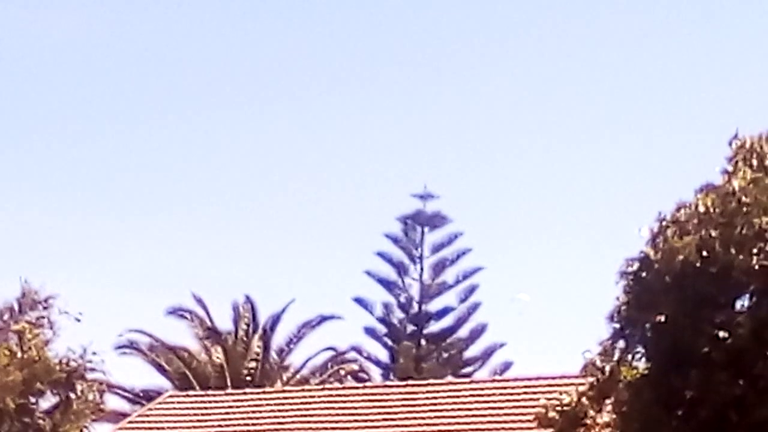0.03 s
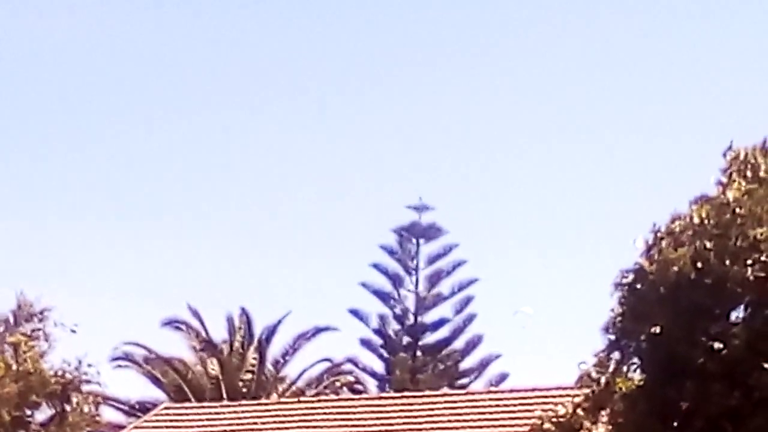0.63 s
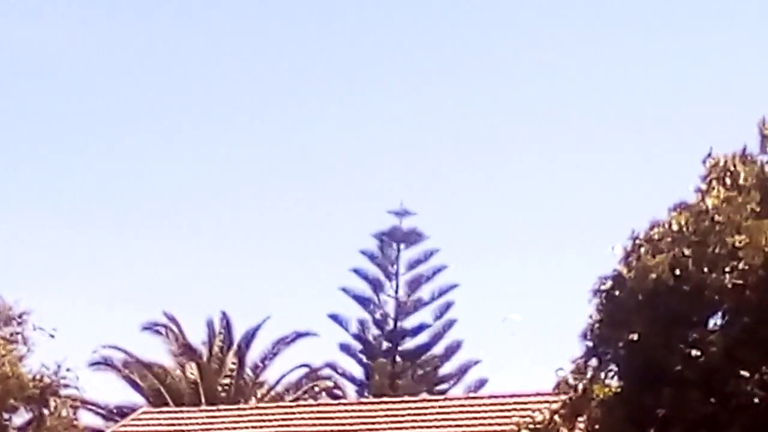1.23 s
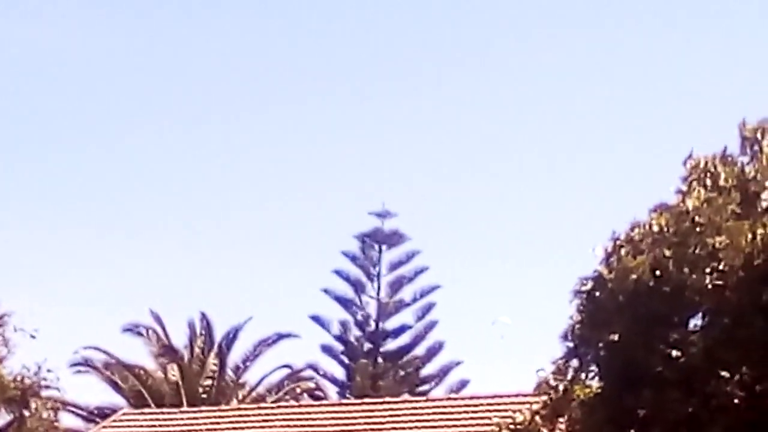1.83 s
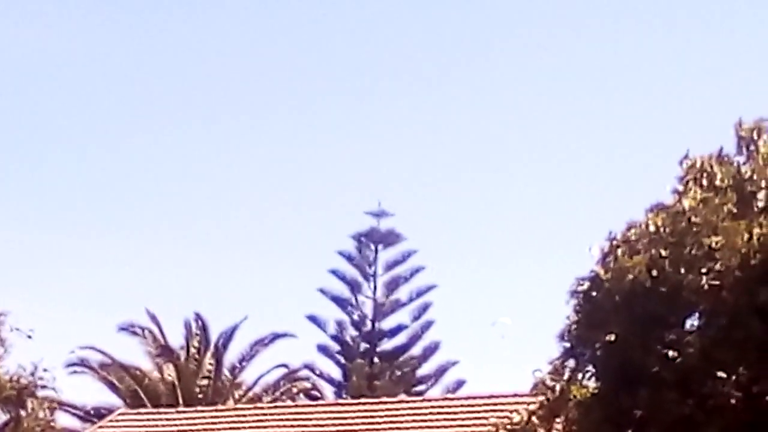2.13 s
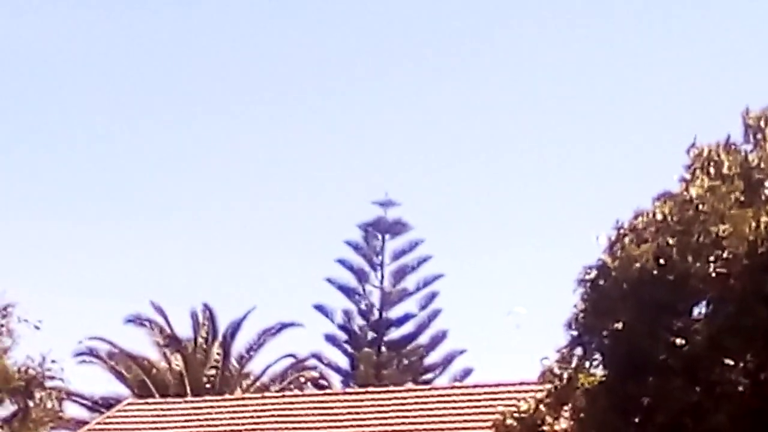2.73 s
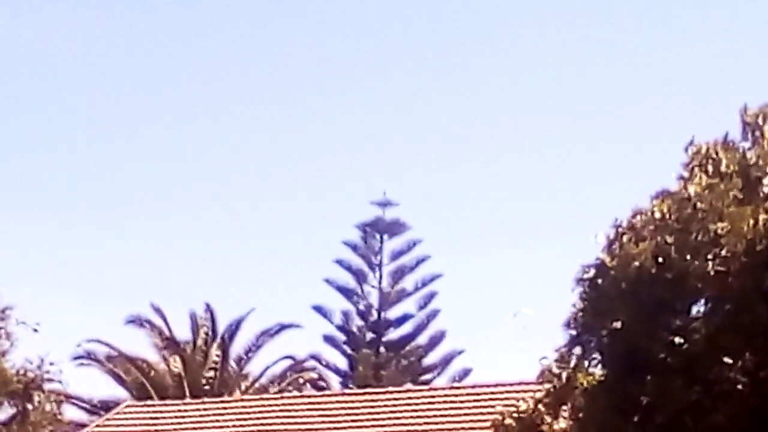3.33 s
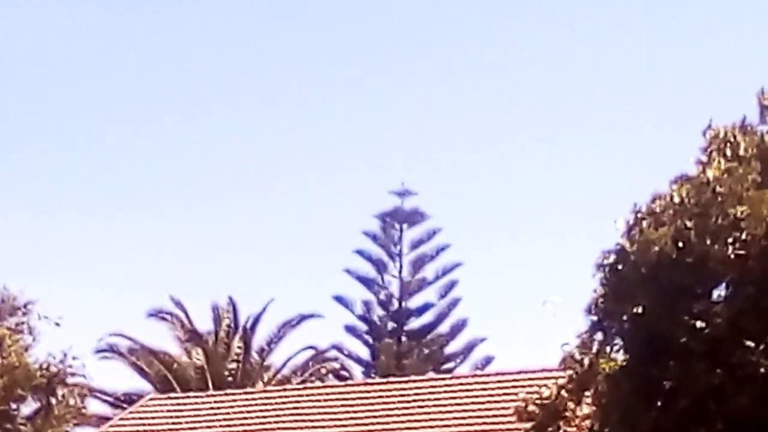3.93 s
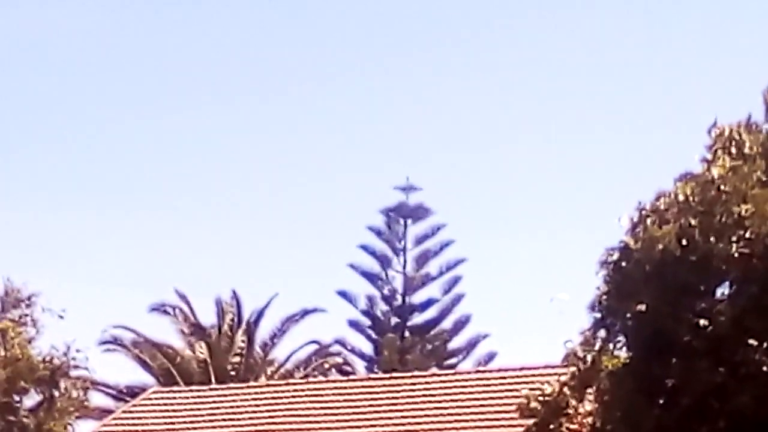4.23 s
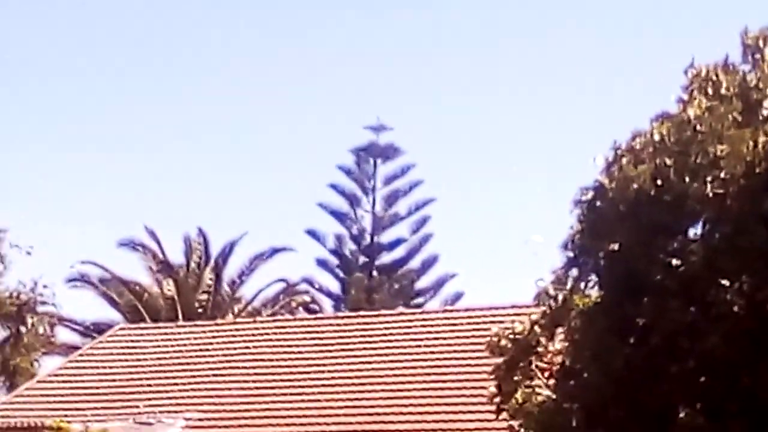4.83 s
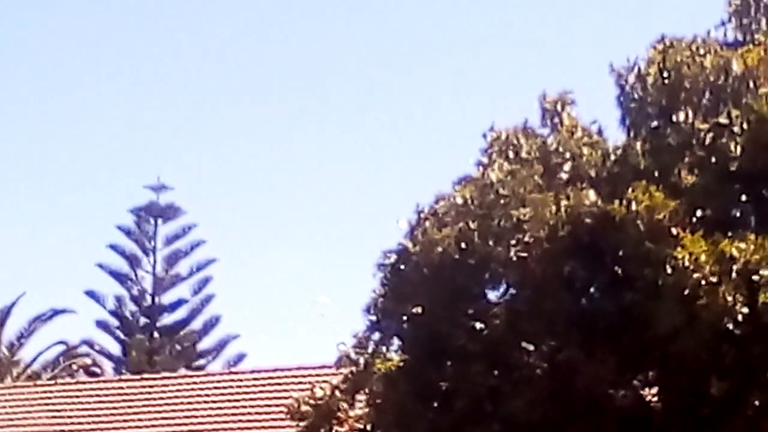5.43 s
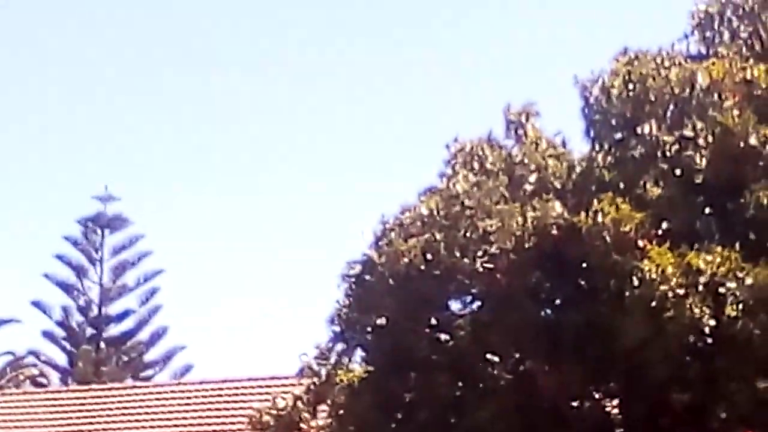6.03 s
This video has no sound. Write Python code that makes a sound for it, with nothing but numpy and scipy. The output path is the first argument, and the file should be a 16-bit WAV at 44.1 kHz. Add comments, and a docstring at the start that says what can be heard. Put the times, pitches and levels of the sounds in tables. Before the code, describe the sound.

Low, wavering drone of a light propeller plane drawing nearer above a quiet garden, with a faint petrol machine buzzing far off.

```python
"""A low drone hangs over a quiet garden and sinks in pitch: a small propeller plane drawing nearer.
Its blades sound harmonics of their passing rate, with a rush of torn air around them.
Further off a petrol garden machine hums and rasps at a hunting speed, over the even hush of the
neighbourhood. A small microphone adds its own hiss and a thin whine."""
import sys
import numpy as np
from scipy import signal
from scipy.fft import rfft, irfft
from scipy.io import wavfile

SR = 44100
rng = np.random.default_rng(int(sys.argv[2]) if len(sys.argv) > 2 else 0)


def store_pcm(level_fs):
    """Save levels as 16-bit WAV."""
    pcm = np.round(np.clip(level_fs, -1, 1) * 32767).astype(np.int16)
    wavfile.write(sys.argv[1], SR, np.atleast_2d(pcm).T)


N = 269010


def from_db(db):
    """The decibel scale: 20 dB is a factor of ten in amplitude."""
    return 10 ** (np.asarray(db) / 20)


def rms_one(x):
    """Normalisation to unit rms."""
    return x / np.sqrt(np.mean(x ** 2) + 1e-20)


def in_time(rows):
    """Linear interpolation: one value per sample for each column after the time."""
    times_s, *columns = np.transpose(rows)
    return [np.interp(np.arange(N) / SR, times_s, column) for column in columns]


def drift(rate_hz):
    """Random fluctuation: noise of unit rms, low-passed at rate_hz."""
    hz = np.arange(N // 2 + 1) * SR / N
    return rms_one(irfft(rfft(rng.standard_normal(N)) / (1 + (hz / rate_hz) ** 4), N))


def coloured_noise(spectrum):
    """Spectral shaping: white noise takes on the given contour, at unit rms."""
    hz = np.maximum(np.arange(N // 2 + 1) * SR / N, 1)
    points_hz, level_db = np.transpose(spectrum)
    gain = from_db(np.interp(np.log(hz), np.log(points_hz), level_db))
    return rms_one(irfft(rfft(rng.standard_normal(N)) * gain, N))


def band_noise(low_hz, high_hz):
    """Band-pass filtering: noise of unit rms between two edges."""
    band = signal.butter(2, [low_hz, high_hz], "band", fs=SR, output="sos")
    return rms_one(signal.sosfilt(band, rng.standard_normal(N + SR))[SR:])


def turning(rate_hz):
    """Phase is the time integral of frequency."""
    return 2 * np.pi * np.cumsum(rate_hz) / SR


def tone(angle):
    """Simple harmonic motion: a sine of unit rms with a random starting phase."""
    return np.sqrt(2) * np.sin(angle + rng.uniform(0, 2 * np.pi))


def far_tones(angle, orders, scatter, flutter_hz):
    """Multipath interference: scattered sound makes each harmonic waver in level and phase."""
    out = np.zeros(N)
    for multiple, level_db in orders:
        paths = 1 + scatter * (drift(flutter_hz) + 1j * drift(flutter_hz))
        out += from_db(level_db) * rms_one((paths * np.exp(1j * multiple * angle)).imag)
    return out


def puffs(angle, low_hz, high_hz, sharpness):
    """Amplitude modulation: one burst of noise on every turn, at unit rms."""
    return rms_one(np.exp(sharpness * np.cos(angle)) * band_noise(low_hz, high_hz))


def self_noise(hiss_db, whine_hz, whine_db, overtone_db):
    """Electronic self-noise: the microphone hisses, with a faint whine and its octave."""
    # spectrum of the hiss: frequency_hz, relative_density_db
    hiss_spectrum = [(1000, -6), (4000, 0), (6400, -0.5), (7300, -7), (8000, -13), (13900, -13.5),
                     (14700, 0), (16000, -6)]
    angle = turning(np.full(N, whine_hz))
    whine = from_db(whine_db) * tone(angle) + from_db(overtone_db) * tone(2 * angle)
    return from_db(hiss_db) * coloured_noise(hiss_spectrum) + whine


def neighbourhood(hush_db, sway_db):
    """Ambient noise: far traffic and air merge into a gently swaying hush."""
    # spectrum of the hush: frequency_hz, relative_density_db
    hush_spectrum = [(45, -23), (61, 6.5), (85, -1), (120, 3.5), (200, -0.5), (270, -1.5), (340, -5),
                     (620, -5.5), (900, -7), (1300, -10), (2000, -18.5), (3000, -26), (6000, -48.5)]
    return from_db(hush_db + sway_db * drift(1.0)) * coloured_noise(hush_spectrum)


def garden_machine(gear_ratio):
    """Rotational harmonics: engine and geared shaft hunt together, each rasping once a turn."""
    # hunting speed of the engine: time_s, rotation_hz
    engine_speed = [(0, 96.8), (.6, 98.6), (2.0, 96.4), (3.1, 95.0), (3.8, 97.1), (4.7, 95.8), (5.1, 97.1),
                    (6.1, 96.9)]
    # harmonics of the engine: multiple, level_db
    engine_orders = [(1, -69), (2, -70), (3, -63.5), (4, -74), (5, -79.5), (6, -69.5), (8, -72.5), (9, -71),
                     (10, -75), (11, -74.5), (12, -67.5), (13, -70), (14, -77)]
    # harmonics of the shaft: multiple, level_db
    shaft_orders = [(4, -68), (5, -69), (7, -71.5), (8, -71), (9, -67), (10, -65.5), (11, -68), (12, -75),
                    (13, -75.5)]
    engine_angle = turning(*in_time(engine_speed))
    shaft_angle = gear_ratio * engine_angle
    engine = far_tones(engine_angle, engine_orders, scatter=0.18, flutter_hz=2.9)
    exhaust = from_db(-72.5) * puffs(engine_angle, low_hz=1080, high_hz=2200, sharpness=1.1)
    shaft = far_tones(shaft_angle, shaft_orders, scatter=0.36, flutter_hz=2.25)
    chop = from_db(-65.5) * puffs(shaft_angle, low_hz=570, high_hz=1510, sharpness=1.6)
    return engine + exhaust + shaft + chop


def plane_rumble(level_db):
    """Narrow-band noise: a faint deep rumble from the plane, near its propeller's rotation rate."""
    return from_db(level_db) * band_noise(24, 31.3)


def noise_hump(course, width_octaves, patchy_db):
    """Independent fading: third-octave bands waver separately under a moving spectral peak."""
    level_db, centre_hz = in_time(course)
    edges_hz = np.geomspace(150, 6000, 17)
    out, power = 0, 1e-12
    for low, high in zip(edges_hz, edges_hz[1:]):
        octaves_away = np.log2(np.sqrt(low * high) / centre_hz)
        gain = np.exp(-.5 * (octaves_away / width_octaves) ** 2)
        out += gain * from_db(patchy_db * drift(1.44)) * band_noise(low, high)
        power += gain ** 2
    return from_db(level_db) * out / np.sqrt(power)


def torn_air():
    """Aerodynamic noise: air torn by the plane makes a rush and a higher swish, both sinking in pitch."""
    # body of the rush: time_s, level_db, centre_hz
    rush_course = [(0, -61, 870), (1.1, -67, 840), (1.9, -57.5, 640), (2.5, -66, 610), (3.2, -61, 540),
                   (4.3, -56, 550), (5.0, -54, 580), (5.4, -59, 490), (5.8, -54, 304)]
    # its swelling, airy top: time_s, level_db, centre_hz
    swish_course = [(0, -84, 3500), (2.0, -81, 3900), (2.9, -77, 2700), (3.5, -68, 2400), (3.8, -69, 1630),
                    (4.6, -69, 1920), (6.1, -72.5, 1950)]
    rush = noise_hump(rush_course, width_octaves=0.48, patchy_db=1.43)
    swish = noise_hump(swish_course, width_octaves=0.42, patchy_db=3.0)
    return rush + swish


def propeller(blades, blade_pass_hz, sag_from_s, sag_until_s, sag_hz_per_s):
    """Blade-passing harmonics: two low tones carry the drone; upper ones grow as the plane nears."""
    # fundamental, fading through the moving air: time_s, level_db
    first_fading = [(0.0, -54), (0.32, -67), (0.63, -53.5), (0.66, -65), (0.73, -49), (2.11, -50),
                    (2.23, -55), (2.8, -48), (3.23, -55.5), (3.53, -47.5), (5.45, -43.5), (6.1, -48.5)]
    # second harmonic, fading on its own: time_s, level_db
    second_fading = [(0.05, -63.5), (0.5, -49.5), (0.58, -56.5), (0.88, -50.5), (1.0, -54), (1.51, -43),
                     (2.29, -48), (2.43, -55), (2.81, -43), (2.91, -53), (4.62, -39.5), (4.89, -42.5),
                     (5.1, -39), (5.42, -46), (5.7, -43), (5.9, -49.5), (5.94, -63), (6.02, -60.5)]
    # weak upper harmonics: multiple, relative_level_db
    upper_orders = [(3, -65.5), (4, -61.5), (5, -75), (7, -76), (8, -74)]
    t = np.arange(N) / SR
    sagging_s = np.clip(t, sag_from_s, sag_until_s) - sag_from_s
    angle = turning(blade_pass_hz - sag_hz_per_s * sagging_s)
    first_gain = from_db(*in_time(first_fading))
    second_gain = from_db(*in_time(second_fading))
    upper_gain = from_db(-14 + 3 * t)  # rises 3 dB a second
    first = first_gain * far_tones(angle, [(1, 0.2)], scatter=0.12, flutter_hz=7.6)
    # a faint throb on every full turn fades with the fundamental
    throb = first_gain * far_tones(angle / blades, [(1, -14.5)], scatter=0.27, flutter_hz=4.0)
    second = second_gain * far_tones(angle, [(2, 0.16)], scatter=0.11, flutter_hz=10.0)
    upper = upper_gain * far_tones(angle, upper_orders, scatter=0.6, flutter_hz=3.8)
    return first + throb + second + upper


def scene():
    """Superposition: plane, machine and hush add at one microphone."""
    plane = propeller(blades=3, blade_pass_hz=75.65, sag_from_s=1.72, sag_until_s=5.35, sag_hz_per_s=1.25)
    plane += torn_air()
    machine = garden_machine(gear_ratio=18 / 25)
    hush = neighbourhood(hush_db=-53, sway_db=0.15)
    return (plane + plane_rumble(level_db=-71) + machine + hush)[None]


def record(dry):
    """Band limiting: the sound and the microphone's self-noise pass a steep low-pass filter."""
    noise = self_noise(hiss_db=-65, whine_hz=6448.5, whine_db=-90, overtone_db=-96)
    low_pass = signal.ellip(12, .1, 80, 15550, fs=SR, output="sos")
    return signal.sosfilt(low_pass, dry + noise)


dry = scene()
out = record(dry)
store_pcm(out)
```